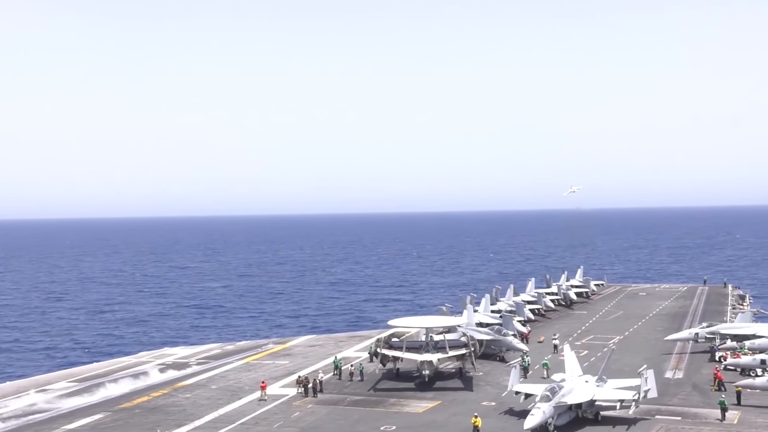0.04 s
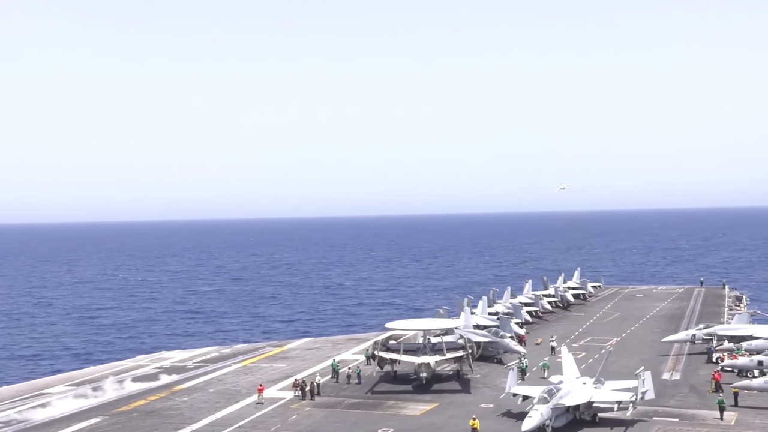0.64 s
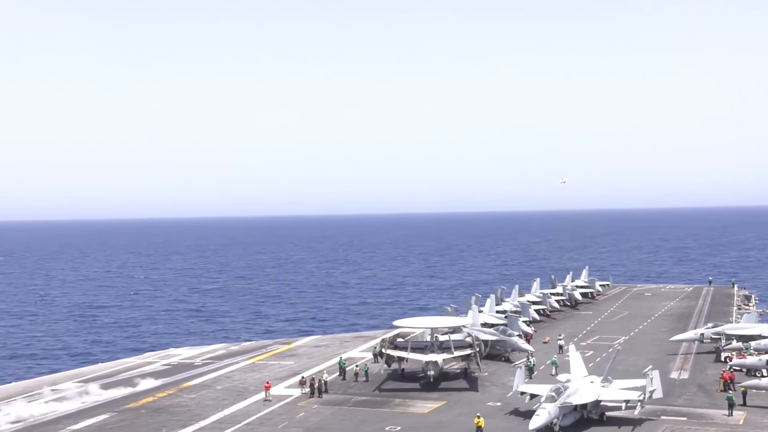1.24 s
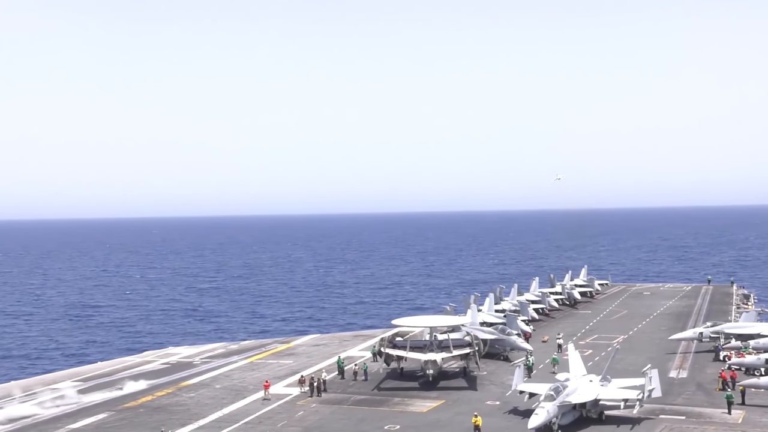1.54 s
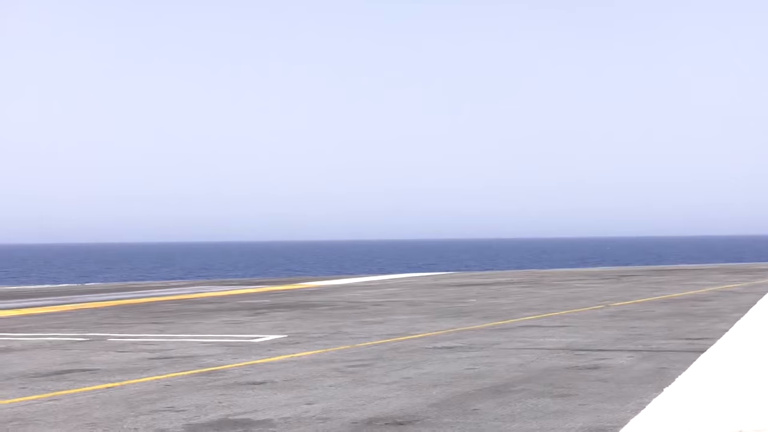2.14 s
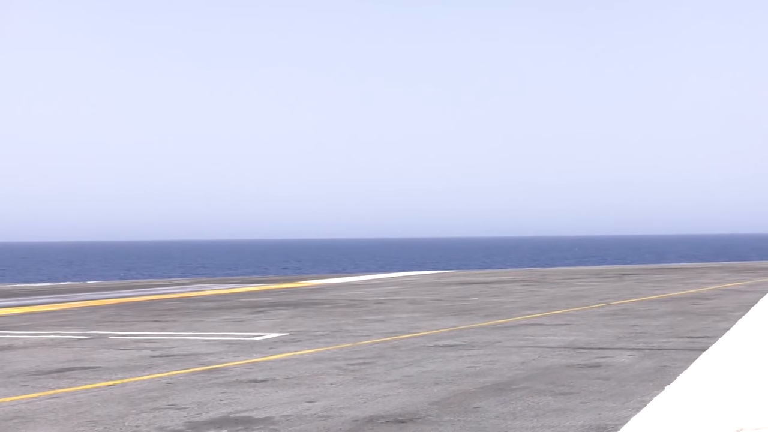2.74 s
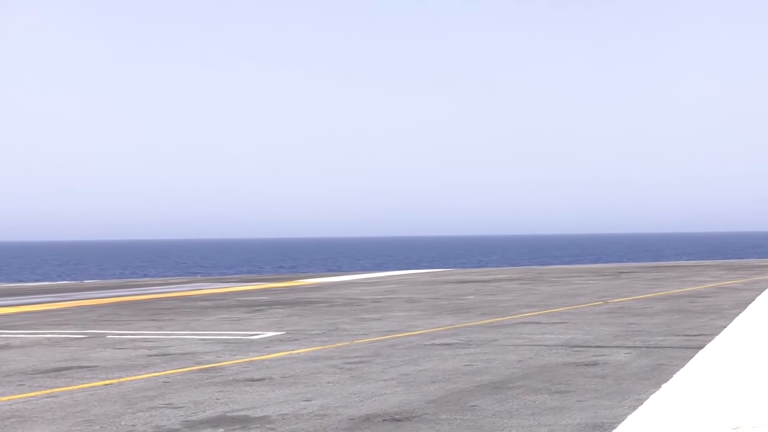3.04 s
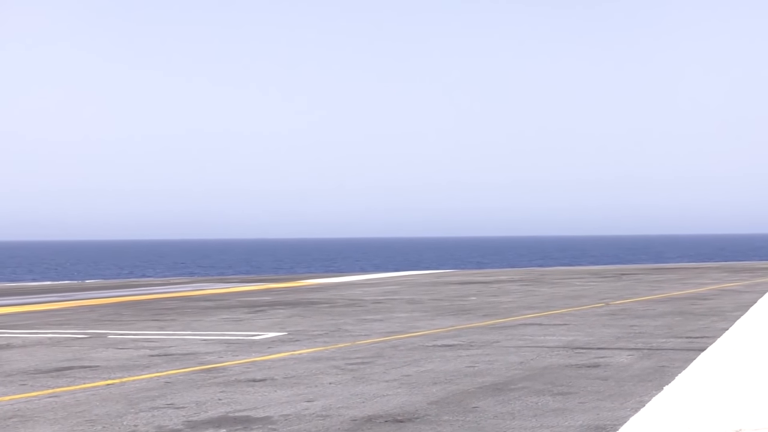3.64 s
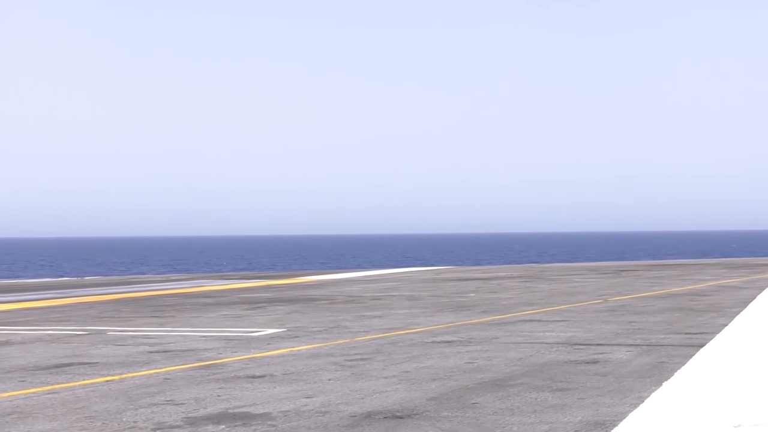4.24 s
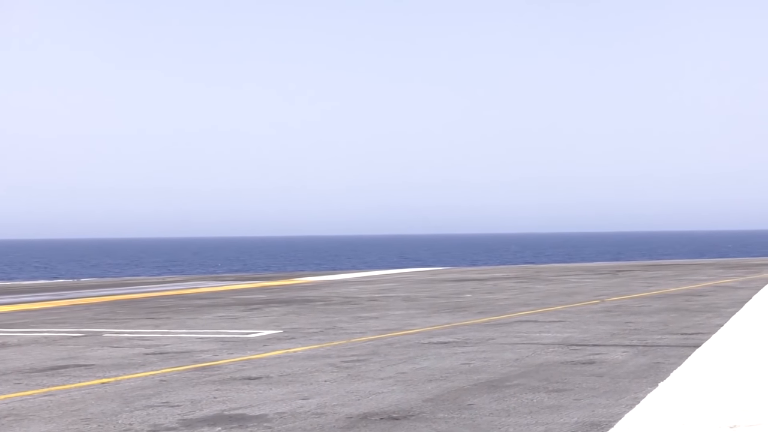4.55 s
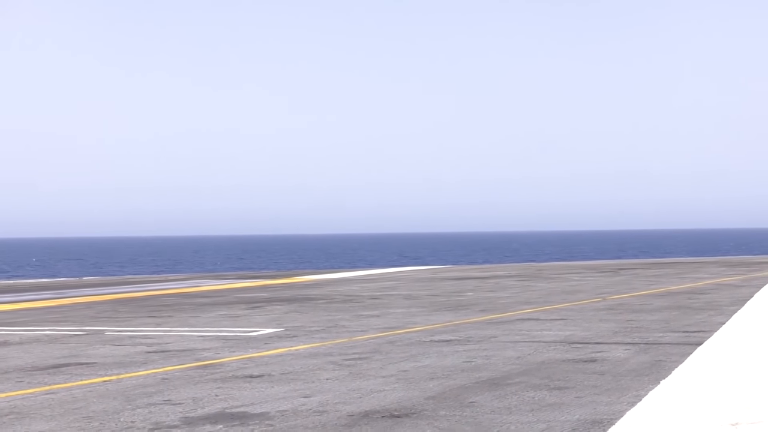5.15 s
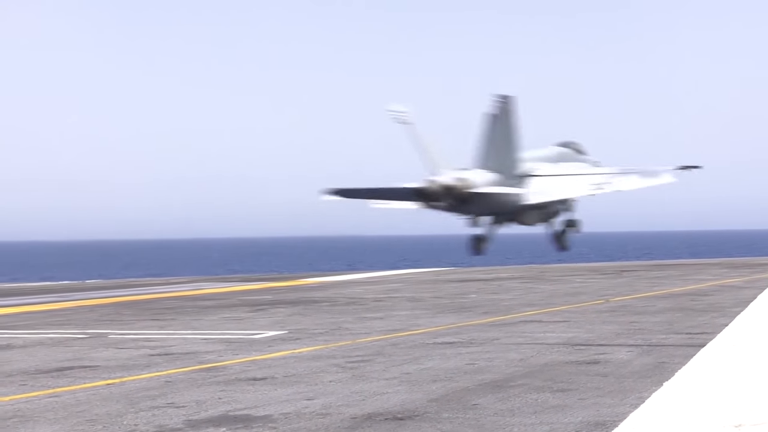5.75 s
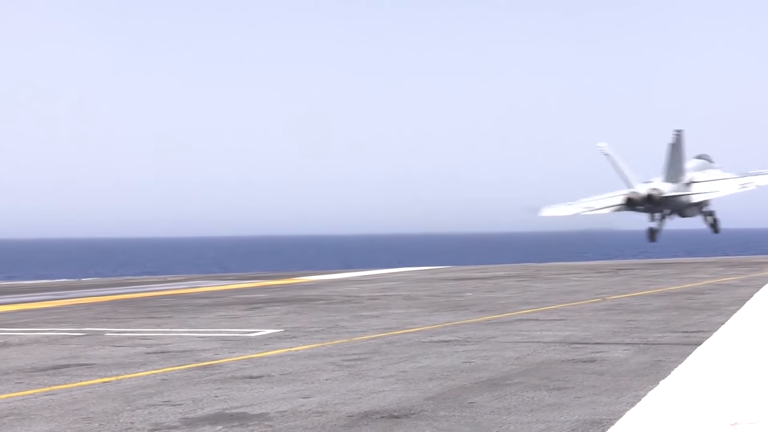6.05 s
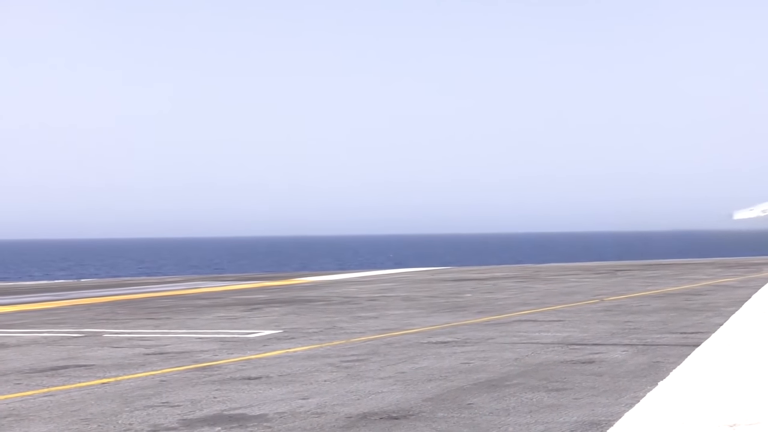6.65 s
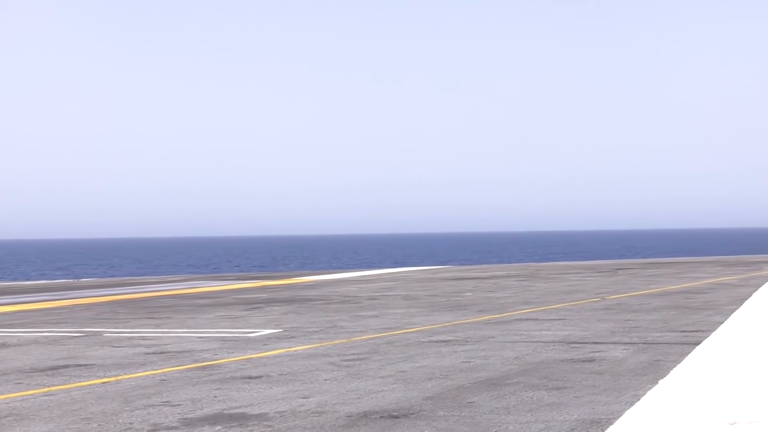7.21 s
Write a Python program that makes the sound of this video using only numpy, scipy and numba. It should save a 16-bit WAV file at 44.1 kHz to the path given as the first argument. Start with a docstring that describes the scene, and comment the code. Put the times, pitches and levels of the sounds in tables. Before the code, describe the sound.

Soft wind and a wavering whine of idling turbines open on an aircraft carrier at sea. Suddenly a far-off jet roars and hisses in uneven surges, then sinks away. A fighter jet rushes by close to the microphone, swelling quickly into a very loud, deep, crackling exhaust roar that overloads and carries on as it climbs away. Wind and whine sit on both sides, the jets on the left only.

```python
"""A ship's flight deck. First, idling turbines whine far below while gusts nudge the microphone.
At 2.1 s, abruptly, deck level: the eddies of a distant jet exhaust rumble, roar, hiss and recede.
A fighter sweeps in, intake and fan first, and passes 14 m away at 5.3 s. Its wake buffets; it spools up
and climbs off, nozzles facing back, booming and tearing. The jets reach only the left channel
and overload it."""
import sys
import numpy as np
from scipy import signal
from scipy.fft import rfft, irfft
from scipy.io import wavfile
from numba import njit

SR = 44100
rng = np.random.default_rng(int(sys.argv[2]) if len(sys.argv) > 2 else 0)


def dump(signal):
    """Clip the signal to [-1, 1] and save it as 16-bit WAV at the path in sys.argv[1]."""
    limited = np.clip(np.atleast_2d(signal).T, -1, 1)
    pcm = np.round(limited * 32767).astype(np.int16)
    wavfile.write(sys.argv[1], SR, pcm)


N = 321048
TIME = np.arange(N) / SR
DECK_LEVEL_S, FULL_POWER_S = 2.098, 6.924
SPEED_M_S, CLOSEST_M, ABEAM_S = 63.6, 14.3, 5.282


def undb(db):
    """Decibels to gain."""
    return 10 ** (np.asarray(db) / 20)


def unit(x):
    """Scale to rms 1."""
    return x / np.sqrt(np.mean(x ** 2))


def since(s):
    """Seconds after s, zero before."""
    return np.maximum(TIME - s, 0)


def until(s):
    """Seconds before s, zero after."""
    return np.maximum(s - TIME, 0)


def bell(x, centre, half_width):
    """Gaussian of height 1."""
    return np.exp(-((x - centre) / half_width) ** 2)


def bumps(rows):
    """Sum of bell-shaped swells in time."""
    return sum(height * bell(TIME, s, half_s) for s, half_s, height in rows)


def bursts(rows):
    """Gain envelope of swells with peaks in dB."""
    return bumps((s, half_s, undb(db)) for s, half_s, db in rows)


def walk(rate_hz):
    """Smooth random drift, rms 1."""
    size = 4096
    f = np.fft.rfftfreq(size, TIME[-1] / size)
    slow = unit(irfft(rfft(rng.standard_normal(size)) * bell(f, 0, rate_hz)))
    return np.interp(TIME, np.linspace(0, TIME[-1], size), slow)


def lowpass(x, hz):
    """One-pole treble loss."""
    return signal.lfilter(*signal.butter(1, hz, fs=SR), x)


def lowcut(x, hz):
    """Four-pole bass cut."""
    return signal.sosfilt(signal.butter(4, hz, "highpass", fs=SR, output="sos"), x)


@njit
def bandpass(x, hz, width_hz):
    """State-variable filter with moving centre and width."""
    y, band_state, low_state = np.empty(len(x)), 0., 0.
    for i in range(len(x)):
        g, damping = np.tan(np.pi * hz[i] / SR), width_hz[i] / hz[i]
        band = (band_state + g * (x[i] - low_state)) / (1 + g * (g + damping))
        band_state = 2 * band - band_state
        low_state += 2 * g * band
        y[i] = damping * band
    return y


def hump(hz, width_hz):
    """Steep-sided noise band, fixed or moving, rms 1."""
    hz, width_hz = hz * np.ones(N), width_hz * np.ones(N)
    once = bandpass(rng.standard_normal(N), hz, width_hz)
    return unit(bandpass(once, hz, width_hz) / np.sqrt(width_hz))


def noise(spectrum):
    """Noise shaped by (Hz, dB) points, rms 1."""
    hz, db = np.transpose(spectrum)
    f = np.maximum(np.fft.rfftfreq(N, 1 / SR), 1)
    gain = undb(np.interp(np.log(f), np.log(hz), db))
    return unit(irfft(rfft(rng.standard_normal(N)) * gain, N))


def turbulent(spectrum, patchy_db, rate_hz):
    """Noise through moving air: each half octave swells and fades on its own; rms 1."""
    bins = rfft(noise(spectrum))
    half_octave = np.clip(2 * np.log2(np.fft.rfftfreq(N, 1 / SR) / 300 + 1e-9), 0, 11)
    total = 0
    for k in range(12):
        share = np.maximum(1 - np.abs(half_octave - k), 0)
        total += irfft(bins * share, N) * undb(patchy_db * walk(rate_hz))
    return unit(total)


def scattered(x, share, rate_hz, longest_s=0.0032, count=12):
    """Churning air adds faint late copies that come and go, shifting the colour."""
    lags_s = longest_s * (np.arange(count) + 1 + rng.random(count)) / (count + 1)
    copies = sum(walk(rate_hz) * np.interp(TIME - np.round(lag * SR) / SR, TIME, x) for lag in lags_s)
    return (x + share * copies / np.sqrt(count)) / np.hypot(1, share)


def eddies(rows, rate_hz, wobble=0.07):
    """Each large eddy booms for a few uneven cycles around its own pitch."""
    warped_s = np.cumsum(1 + wobble * walk(rate_hz)) / SR
    total = 0
    for s, half_s, hz, db in rows:
        tone = np.sqrt(2) * np.sin(2 * np.pi * (hz * warped_s + rng.random()))
        total += tone * undb(db) * bell(TIME, s, half_s)
    return total


# turbine bands: f/Hz, width/Hz, level/dB
IDLE_BANDS = [(832, 76, -68), (610, 220, -68), (1225, 70, -72.5), (1740, 130, -74.5)]
# whine carried over by wind: t/s, half length/s, gain/dB
WHINE_SWELLS = [(.3, 0.33, 7), (1.023, .22, 7.5), (1.5, 0.064, 9), (1.95, .17, 8)]


def idling_turbines(on_deck):
    """Wavering whine that eases off; the nearest turbine adds a thin line."""
    waver = 1 + 0.0039 * walk(rate_hz=0.99)
    whine = sum(hump(hz * waver, width_hz) * undb(db) for hz, width_hz, db in IDLE_BANDS)
    whine += hump(838 * waver, width_hz=13) * undb(-72 + bumps(WHINE_SWELLS))
    return whine * undb(-2 + 2.4 * until(DECK_LEVEL_S) - 8.8 * on_deck)


# hiss and wind spectra: f/Hz, level/dB
DECK_HISS_SPECTRUM = [(20, 3), (100, 5.5), (300, 7), (600, 6), (1000, 4), (3000, 2.5), (8000, 1),
                      (13000, 1)]
WIND_SPECTRUM = [(5, 1), (12, -10.5), (22, -25), (40, -35), (70, -38), (130, -50), (500, -80)]
# gusts and lulls: t/s, half length/s, gain/dB
GUSTS = [(0.17, 0.093, 10), (0.43, 0.049, 11.5), (0.64, 0.034, 6), (0.762, 0.02, 12), (0.83, 0.025, 3),
         (1.09, 0.076, 10), (1.376, 0.02, -8), (1.76, 0.05, -9), (2.065, 0.05, 7)]


def deck_air(on_deck):
    """Broad hiss and wind on the microphone; both drop at deck level."""
    hiss = turbulent(DECK_HISS_SPECTRUM, patchy_db=1.4, rate_hz=13) * undb(-50.5 - 20 * on_deck)
    wind = noise(WIND_SPECTRUM) * undb(-36.5 - 17 * on_deck + bumps(GUSTS))
    return hiss + wind


# centre of the deep band: t/s, f/Hz
DEEP_PITCH = [(2.1, 240), (2.25, 235), (2.42, 264), (2.75, 216), (3.3, 208), (3.8, 223), (4.4, 245)]
# rumble surges: t/s, half length/s, deep gain/dB, upper gain/dB
SURGES = [(2.2, 0.089, 1, -1), (2.887, 0.17, 1, 5), (3.74, 0.32, 1, 5.5), (4.42, 0.13, 11.5, -13)]
# single eddies: t/s, half length/s, f/Hz, level/dB
FAR_EDDIES = [(2.15, 0.02, 215, -25), (2.172, 0.014, 301, -15), (2.225, 0.04, 226, -19.5),
              (2.31, 0.033, 252.5, -25), (2.4, 0.035, 274, -24), (2.778, 0.018, 333, -24.5),
              (2.895, 0.03, 350, -17.5), (3.0, 0.022, 333, -22), (3.315, 0.03, 204, -26),
              (3.44, 0.035, 199, -25), (3.485, 0.037, 430, -26.5), (3.685, 0.024, 403, -27.5)]


def distant_rumble(flutter):
    """Large eddies rumble in two broad bands that surge and recede."""
    at_s, half_s, deep_surge_db, upper_surge_db = np.transpose(SURGES)
    deep_db = -22 - 8 * since(DECK_LEVEL_S) + bumps(zip(at_s, half_s, deep_surge_db))
    upper_db = -23.5 - 6.5 * since(DECK_LEVEL_S) + bumps(zip(at_s, half_s, upper_surge_db))
    deep_hz = np.interp(TIME, *np.transpose(DEEP_PITCH)) * (1 + 0.055 * walk(rate_hz=2.1))
    upper_hz = 414 * 2 ** (-0.42 * np.abs(TIME - 3.68))
    deep = hump(deep_hz, 0.48 * deep_hz) * undb(deep_db)
    upper = hump(upper_hz, 0.57 * upper_hz) * undb(upper_db)
    return lowcut(deep + upper, hz=139) * undb(0.59 * flutter) + eddies(FAR_EDDIES, rate_hz=43.5)


# distant roar spectrum: f/Hz, level/dB
FAR_ROAR_SPECTRUM = [(20, -22), (60, -10), (150, 2.5), (450, 5.5), (640, -3), (850, 1), (1150, -3.5),
                     (1430, -7.5), (1700, -7), (2400, -16.5), (5000, -29), (13000, -70)]


def distant_roar(flutter):
    """Small eddies roar and fade; a midrange swell climbs an octave."""
    opening_db = -3 * np.exp(-since(DECK_LEVEL_S) / 0.27)
    level_db = -25.5 + opening_db + 2.5 * until(2.95) - 3.5 * since(2.95)
    roar = turbulent(FAR_ROAR_SPECTRUM, patchy_db=-1.8, rate_hz=30)
    roar *= undb(level_db + 0.38 * flutter + 0.13 * walk(rate_hz=54))
    swell_s = 2.73
    swell_hz = 947 * 2 ** np.clip(2.6 * (TIME - swell_s), -0.6, 0.4)
    swell = hump(swell_hz, 0.65 * swell_hz) * bell(TIME, swell_s, 0.71)
    return roar + swell * undb(-30.5 + flutter)


# hiss and flare spectra: f/Hz, level/dB
FAR_HISS_SPECTRUM = [(500, -39), (1700, -1.5), (2700, 2), (4300, -1.5), (5500, -8), (7000, -13),
                     (9000, -21), (13000, -39.5)]
FLARE_SPECTRUM = [(2000, -30), (4500, 3), (6000, 1), (7500, -2), (9500, -14), (13000, -26)]
# flares: t/s, half length/s, level re hiss/dB
HISS_FLARES = [(2.223, 0.26, -10), (3.15, 0.061, -11), (3.492, 0.076, -6), (3.82, 0.034, -10),
               (4.52, .06, -15)]


def distant_hiss(flutter):
    """Small eddies hiss with brief bright flares; the level creeps up, then falls."""
    hiss = turbulent(FAR_HISS_SPECTRUM, patchy_db=1, rate_hz=15)
    hiss += noise(FLARE_SPECTRUM) * bursts(HISS_FLARES)
    hiss = scattered(hiss, share=0.38, rate_hz=9)
    level_db = -35 - 1.5 * until(3.12) - 6 * since(3.12)
    return hiss * undb(level_db + 0.19 * flutter + 0.5 * walk(rate_hz=130))


def distant_jet():
    """Far exhaust: moving air flutters all layers together; it dies away at the end."""
    flutter = walk(rate_hz=61)
    exhaust = distant_rumble(flutter) + distant_roar(flutter) + distant_hiss(flutter)
    return exhaust * undb(-12 * since(4.52))


# wake spectrum: f/Hz, level/dB
WAKE_SPECTRUM = [(15, 8), (35, 16), (70, 12), (110, -24), (250, 2), (2000, -66)]
# wake blasts: t/s, half length/s, gain/dB
WAKE_BLASTS = [(5.9, 0.16, 17.5), (6.76, 0.11, 8)]


def wake_buffet(arrival_s=5.39, rise_s=0.061):
    """Deep buffeting, faint until the fighter's wake arrives."""
    ahead = (1 + np.tanh((arrival_s - TIME) / rise_s)) / 2
    return noise(WAKE_SPECTRUM) * undb(-18.5 - 20 * ahead + bumps(WAKE_BLASTS))


# beams: f/Hz, width/Hz, level/dB, angle off tail/deg, half width/deg
ENGINE_BEAMS = [(510, 380, -20, 106, 27.5), (1080, 420, -23, 115, 31), (6900, 4500, -29, 116.4, 28.5),
                (4530, 2000, -22.5, 90, 31), (7000, 4800, -17, 65, 17), (730, 230, -12.5, 60, 36),
                (1720, 870, -10, 52.6, 20.4), (3740, 2300, -12, 44, 9.3)]


def engine_beams(off_tail_deg):
    """Intake, fan and exhaust beam noise bands; each swells as it sweeps over the listener."""
    return sum(hump(hz, width_hz) * undb(db) * bell(off_tail_deg, aim_deg, half_deg)
               for hz, width_hz, db, aim_deg, half_deg in ENGINE_BEAMS)


def shock_crackle(off_tail_deg, per_s=1800, spread_db=1.5):
    """Steep shock fronts of uneven size, at random moments, beamed at one angle off the tail."""
    fronts = (rng.random(N) < per_s / SR) * undb(spread_db * np.minimum(rng.exponential(size=N), 4))
    crackle = unit(lowcut(lowpass(fronts, hz=13000), hz=900))
    return crackle * undb(-21) * bell(off_tail_deg, 26.5, 5.1)


# tearing spectrum: f/Hz, level/dB
TEAR_SPECTRUM = [(600, -21), (1500, 1.5), (3500, 0), (5000, -11), (8000, -11), (13000, -26)]
# tears: t/s, half length/s, level/dB
TEARS = [(5.857, 0.075, -15.5), (6.262, 0.033, -23), (6.374, 0.033, -16), (6.775, 0.024, -17),
         (6.93, 0.016, -13), (7.138, .03, -24)]


def exhaust_tearing(off_tail_deg):
    """From behind, the exhaust crackles and swells raspingly."""
    shocks = shock_crackle(off_tail_deg)
    tears = noise(TEAR_SPECTRUM) * bursts(TEARS)
    return (tears + shocks) * undb(3.1 * walk(rate_hz=42))


# fighter hiss spectrum: f/Hz, level/dB
NEAR_HISS_SPECTRUM = [(300, -24), (1200, -3.5), (2400, -7), (3200, -1.5), (4050, 0.5), (5000, -2),
                      (7000, -3.5), (9000, -6.5), (13000, -12.5)]


def fighter_hiss(distance_m, nose_on, churn):
    """Hiss grows until full power, then fades; duller far off or nose-on."""
    level_db = 3.5 - 24.5 * nose_on - 5 * until(FULL_POWER_S) - 15 * since(FULL_POWER_S)
    hiss = turbulent(NEAR_HISS_SPECTRUM, patchy_db=1, rate_hz=11)
    hiss = scattered(hiss, share=0.49, rate_hz=10.8)
    hiss *= undb(level_db + 0.5 * churn + 0.49 * walk(rate_hz=22))
    dull = np.clip((distance_m - 16) / 72 + 0.71 * nose_on, 0, 1)
    return hiss + dull * (lowpass(hiss, hz=5270) - hiss)


# fighter roar spectrum: f/Hz, level/dB
NEAR_ROAR_SPECTRUM = [(20, -55), (100, -10), (300, -6), (550, 0.5), (670, -2.5), (900, -2), (1400, -7.5),
                      (1750, -9.5), (2500, -13), (5000, -22), (14000, -69)]


def fighter_roar(nose_on, churn):
    """The roar swells as the nozzles turn to the listener."""
    roar = turbulent(NEAR_ROAR_SPECTRUM, patchy_db=1.5, rate_hz=16)
    return roar * undb(11 - 26.5 * nose_on + 0.25 * churn)


# boom centre, sinking as the cone arrives, rising with power: t/s, f/Hz
BOOM_PITCH = [(5.8, 242), (5.98, 187), (6.48, 181), (6.7, 230), (7.28, 253)]


def fighter_rumble(off_tail_deg, nose_on, churn, spool_oct_s=0.4):
    """The rumble's lobe sweeps by; in the cone behind the nozzles a deeper boom takes over."""
    lobe_db = 12 * bell(off_tail_deg, 18.5, 5.9)
    in_cone = (1 + np.tanh((18.4 - off_tail_deg) / 4.4)) / 2
    rumble_hz = 462 * 2 ** (-spool_oct_s * until(FULL_POWER_S))
    rumble = hump(rumble_hz, 0.87 * rumble_hz) * undb(2 - 17 * nose_on + lobe_db - 1.5 * in_cone)
    boom_hz = np.interp(TIME, *np.transpose(BOOM_PITCH))
    boom = hump(boom_hz, 0.84 * boom_hz) * undb(15) * in_cone
    return lowcut(rumble + boom, hz=132.5) * undb(churn)


def deck_bounce(x, nozzles_abeam_s=5.41, max_lag_ms=0.426, fade_db_s=34):
    """The deck reflection lags most as the nozzles pass: its notches slide down, then up."""
    nearness = CLOSEST_M / np.hypot(SPEED_M_S * (TIME - nozzles_abeam_s), CLOSEST_M)
    share = 0.27 * np.sqrt(nearness) * undb(-fade_db_s * since(nozzles_abeam_s))
    late = np.interp(TIME - max_lag_ms * nearness / 1000, TIME, lowpass(x, hz=6960))
    return (x + share * late) / (1 + share / 2)


# eddies of the departing exhaust: t/s, half length/s, f/Hz, level/dB
THROBS = [(5.76, 0.03, 315, -4.5), (5.893, 0.027, 420, -1), (5.98, 0.028, 333, -2.5), (6.07, 0.03, 183, -1),
          (6.215, 0.03, 185.9, -3), (6.31, 0.026, 204, -1.5), (6.49, 0.026, 172, -5),
          (6.65, 0.031, 279, -1.5), (6.733, 0.028, 247, 0), (6.815, 0.032, 231, -1), (7.04, 0.029, 275, -5),
          (7.205, 0.019, 258, -0.5)]


def fighter(clears_stern_s=4.6, shield_db_s=34, spool_db_s=6):
    """Straight pass with engines spooling up, shielded by the deck until it clears the stern."""
    along_m = SPEED_M_S * (TIME - ABEAM_S)
    distance_m = np.hypot(along_m, CLOSEST_M)
    off_tail_deg = np.degrees(np.arctan2(CLOSEST_M, along_m))
    nose_on = (1 - along_m / distance_m) / 2
    spool_gain = undb(-spool_db_s * until(FULL_POWER_S))
    path_gain = CLOSEST_M / distance_m * undb(-shield_db_s * until(clears_stern_s))
    churn = walk(rate_hz=110)
    rumble = fighter_rumble(off_tail_deg, nose_on, churn) * spool_gain
    roar = fighter_roar(nose_on, churn) * spool_gain
    hiss = fighter_hiss(distance_m, nose_on, churn)
    wake = wake_buffet() * spool_gain
    jet = deck_bounce(rumble + roar + hiss + engine_beams(off_tail_deg)) + wake
    return jet * path_gain + eddies(THROBS, rate_hz=45) + exhaust_tearing(off_tail_deg)


def scene():
    """Jets on the left; turbines and air on both sides, drawn separately."""
    on_deck = np.clip((TIME - DECK_LEVEL_S) / 0.0011, 0, 1)
    left = idling_turbines(on_deck) + deck_air(on_deck) + on_deck * (distant_jet() + fighter())
    right = idling_turbines(on_deck) + deck_air(on_deck)
    return np.array([left, right])


def overload(x, ceiling=0.46, treble_share=0.74, rail=0.76):
    """The input stage flattens big slow swings; some treble rides over them, up to the rail."""
    treble = treble_share * (x - lowpass(x, hz=2530))
    flattened = ceiling * np.tanh((x - treble) / ceiling) + treble
    return flattened / (1 + (flattened / rail) ** 8) ** (1 / 8)


def record(dry):
    """Overload, steep top cut, full-scale limit."""
    top_cut = signal.ellip(10, 0.2, 70, 13500, fs=SR, output="sos")
    return np.clip(signal.sosfilt(top_cut, overload(dry)), -1, 1)


dry = scene()
out = record(dry)
dump(out)
```